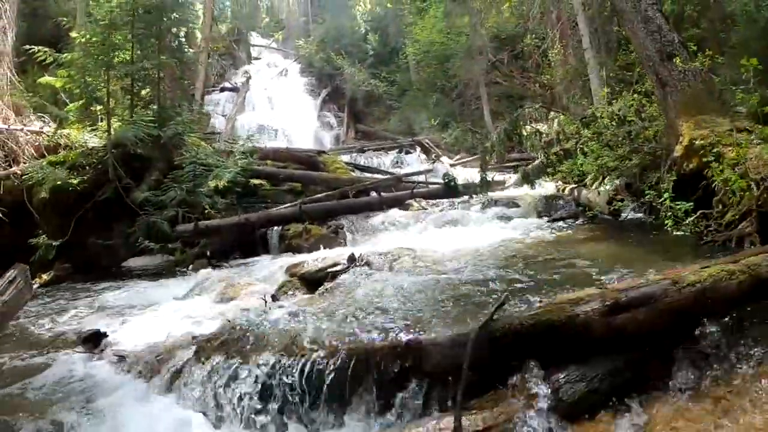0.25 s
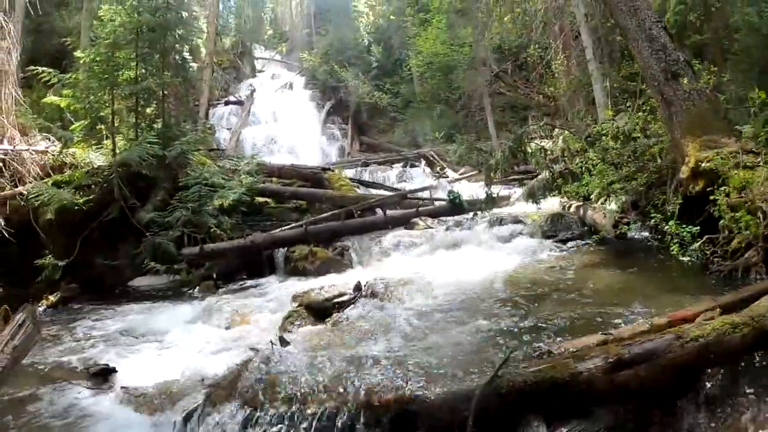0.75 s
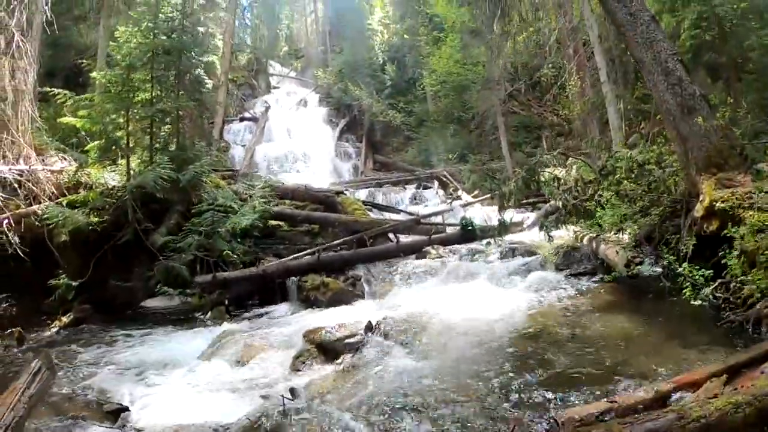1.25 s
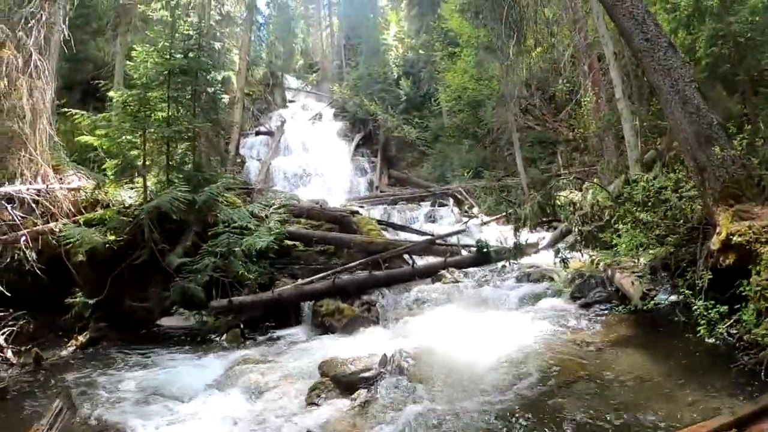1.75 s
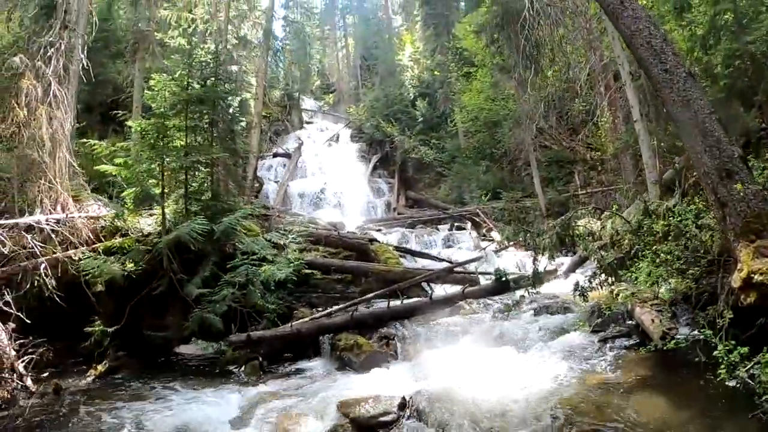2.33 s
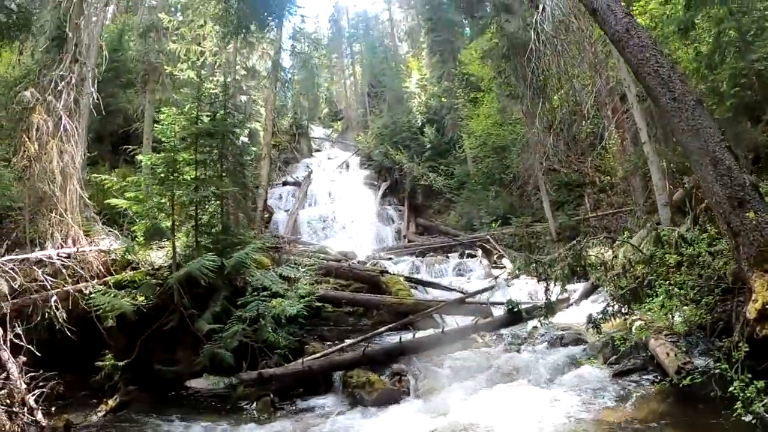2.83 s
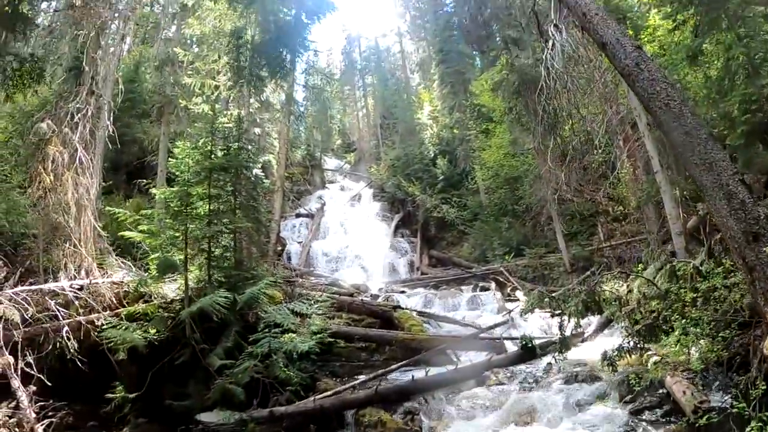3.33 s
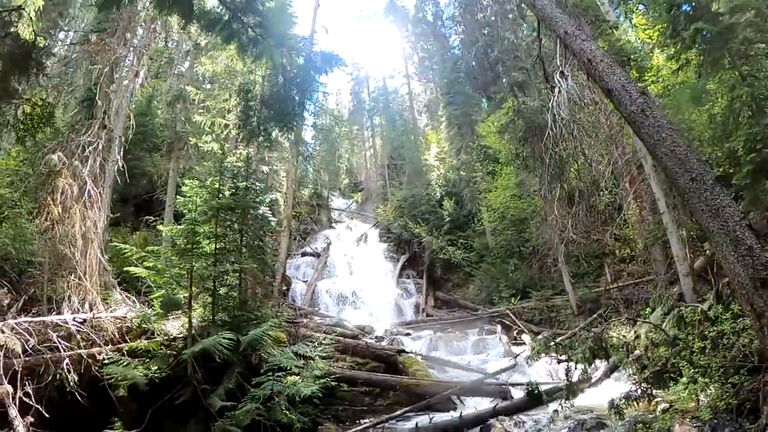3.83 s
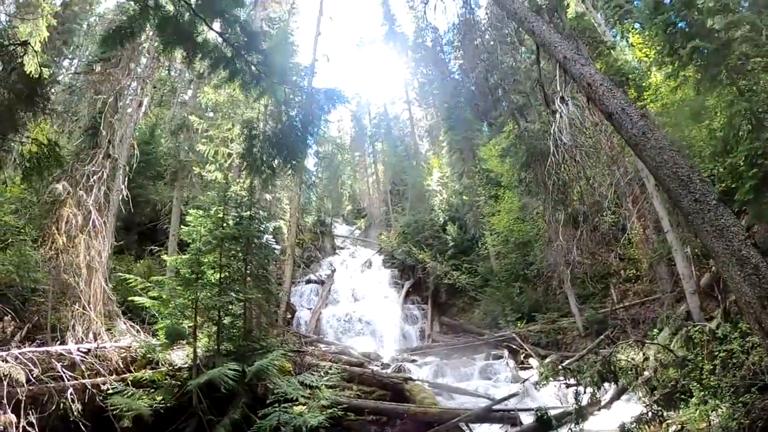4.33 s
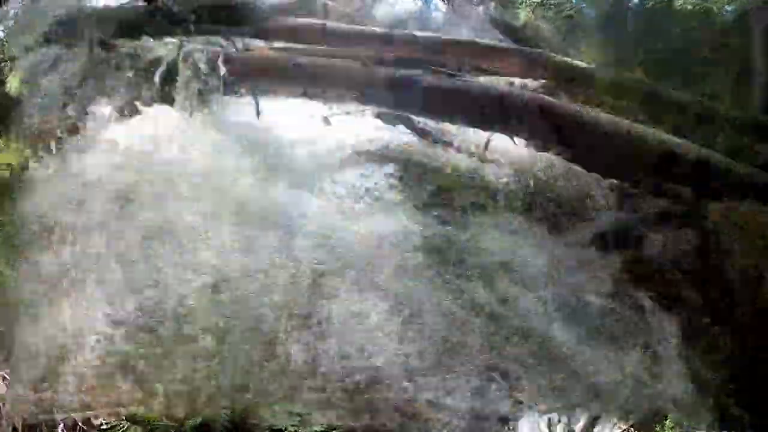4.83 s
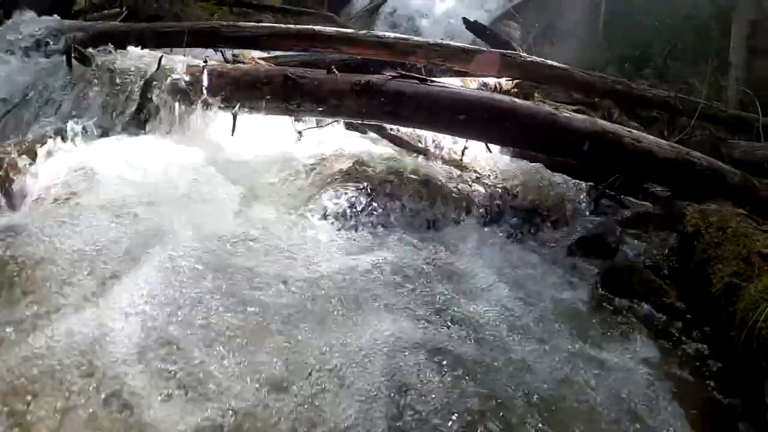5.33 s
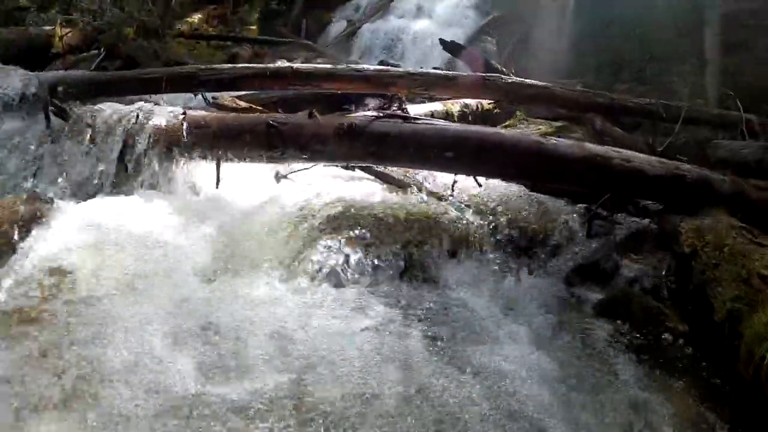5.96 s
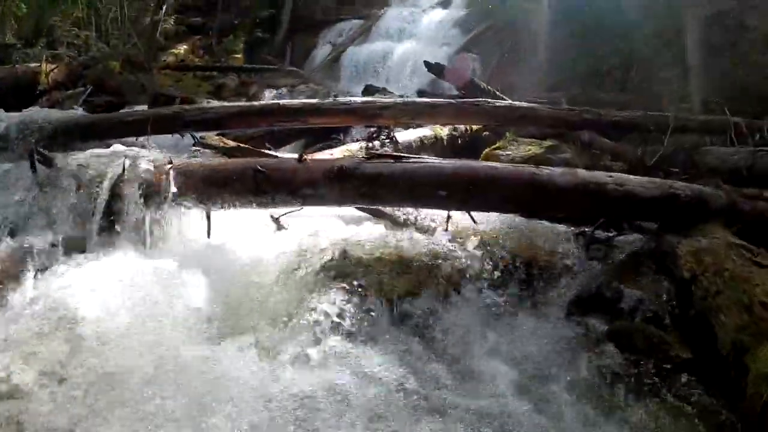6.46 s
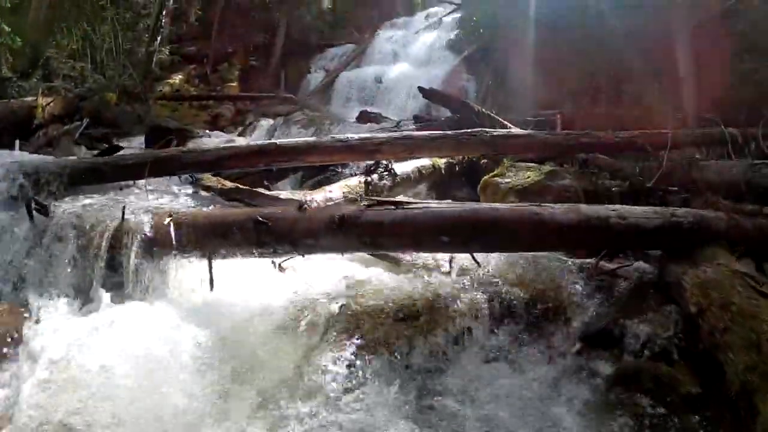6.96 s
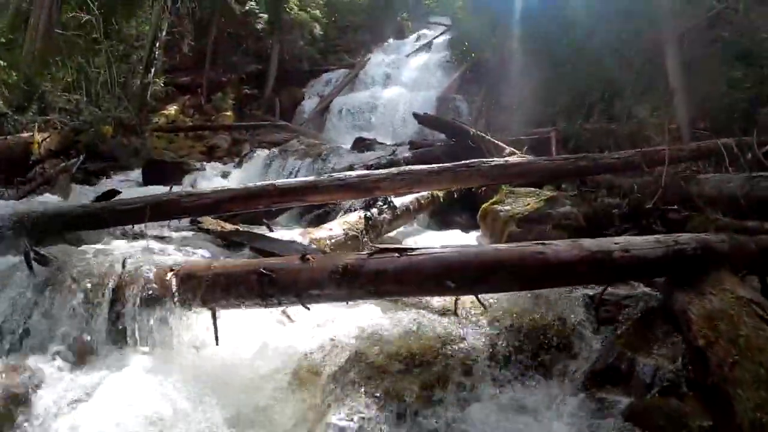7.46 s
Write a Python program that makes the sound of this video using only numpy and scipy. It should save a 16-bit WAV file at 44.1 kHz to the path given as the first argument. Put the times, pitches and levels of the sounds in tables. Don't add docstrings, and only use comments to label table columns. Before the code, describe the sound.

A muffled, hollow roar of waterfall and creek heard through a water-blocked microphone, then an abrupt change to bright, full, splashing rush close by.

```python
import sys
import numpy as np
from scipy import signal
from scipy.io import wavfile
from scipy.ndimage import uniform_filter1d

SR = 44100
rng = np.random.default_rng(int(sys.argv[2]) if len(sys.argv) > 2 else 0)


def volts_from_decibels(level):
    exponent = np.asarray(level, float) / 20
    return 10 ** exponent


def transcribe(signal):
    frames = np.atleast_2d(signal).T
    limited = np.clip(frames, -1, 1)
    pcm = np.round(limited * 32767).astype(np.int16)
    wavfile.write(sys.argv[1], SR, pcm)


N = 339129
CUT_S = 4.8697


def rush(foam, points, rings, layers, low_hz, high_hz, bubbly, patchy_db, flicker_db, steady, splashes):
    water = np.sqrt(1 - bubbly) * rng.standard_normal(len(foam)) + np.sqrt(bubbly) * foam
    hz, t, z = signal.stft(water, SR, nperseg=1024, noverlap=896)
    s = t - .5

    z = z / np.sqrt(uniform_filter1d((abs(z) ** 2).mean(1), size=25))[:, None]
    z = steadied(z, hz, steady)
    z = z / np.sqrt(uniform_filter1d((abs(z) ** 2).mean(1), size=3))[:, None]

    shape = volts_from_decibels(colour_db(points, rings, hz, s))
    body_db, low_db, high_db = layer_db(*layers, s)
    low = 1 / (1 + (hz / low_hz) ** 4)
    high = 1 / (1 + (high_hz / (hz + 1)) ** 4)
    bands = [(low, low_db, hz < low_hz),
             (1 - low - high, body_db, (hz >= low_hz) & (hz < high_hz)),
             (high, high_db, hz >= high_hz)]
    field_db = 0
    for part, db, inside in bands:
        present_db = 10 * np.log10((shape[inside] ** 2).sum(0) * 4 / 3)
        field_db = field_db + part[:, None] * (db - present_db)

    for (at_s, centre_hz, db, length_s), breadth in splashes:
        spread = np.exp(-(np.log((hz + 1) / centre_hz) / breadth) ** 2)
        field_db = field_db + np.outer(db * spread, bell(s - at_s, length_s))

    patches = blotches(z.shape, bins=14, frames=24)
    flicker = blotches(z.shape, bins=200, frames=6)
    z = z * shape * volts_from_decibels(field_db + patchy_db * patches + flicker_db * flicker)
    return signal.istft(z, SR, nperseg=1024, noverlap=896)[1][SR // 2:][:N]


def bubbles(per_s, spread_db, cycles):
    out = np.zeros(N + SR)
    for hz in np.geomspace(80, 16000, num=30):
        t = np.arange(0, cycles / hz, 1 / SR)
        rising = 1 + 0.061 * hz * t / cycles
        tone = np.sin(2 * np.pi * hz * t * rising) * np.hanning(len(t))
        chance, size = rng.random(len(out)), rng.exponential(1, len(out))
        often = per_s * hz / 1000
        train = (chance < often / SR) * volts_from_decibels(spread_db * np.minimum(size, 4))
        out += evened(signal.oaconvolve(train, tone)[:len(out)]) * np.sqrt(hz)
    return evened(out)


# (level [dB], drift while turning [dB/s], share of the fade [1])
BLOCKED = [
    (-16, -1.07, 0.61),
    (-29, -0.86, 0.96),
    (-43.5, -0.7, 0.66),
]
# (frequency [Hz], density [dB/Hz])
FILM = [(8, -19), (25, -12.5), (100, -12.5), (300, -15.5), (600, -18.5), (1000, -33), (1500, -39),
        (2600, -51), (3000, -58.5), (3700, -61.5), (5400, -68.5), (9000, -76), (10500, -87), (16000, -101)]
# (frequency [Hz], width [Hz], boost [dB], pitch drift [Hz/s], boost drift [dB/s])
FILM_RINGS = [
    (458, 64, 16.5, 7, -0.5),
    (1054, 52, -5.5, 2, 0.5),
    (1196, 70, 10, -0.5, -0.5),
    (4440, 240, 2, -0.5, 1.34),
    (6200, 600, 4, -1, 0),
    (8800, 2500, 3.5, -3, -0.45),
    (11800, 1200, 7, -1, -0.8),
]
# (start [s], end [s])
TILT_UP = (0., 3)
# (length [s], gain left [1])
FADE_OUT = (0.19, 0.21)
# (time [s], frequency [Hz], boost [dB], length [s])
SWELLS = [(0.319, 90, 9.5, 0.06), (0.36, 150, -6, 0.069), (0.528, 100, -2, 0.06), (0.673, 60.4, 6, 0.06),
          (0.842, 270, 4.5, 0.11), (0.888, 119, 8, 0.06), (0.952, 60, 3, 0.06), (1.051, 100, 9, 0.074),
          (1.265, 50, -5.4, 0.06), (1.353, 80.3, 6.5, 0.06), (1.834, 80, 6.5, 0.057), (2.09, 190, 0, 0.06),
          (2.154, 100, -8, 0.12), (2.397, 140.6, 2.5, 0.16), (2.769, 129, -7, 0.06), (2.792, 70, -9, 0.06),
          (2.879, 100, 7, 0.06), (3.001, 80, 0, 0.06), (3.042, 50, 7, 0.06), (3.39, 109, -4.3, 0.1),
          (3.495, 150, 4.5, 0.06), (3.756, 50, 5.5, 0.11), (4.122, 60.5, 8, 0.06), (4.313, 210, 4, 0.06),
          (4.592, 60, 5, 0.06), (4.696, 70, -2, 0.06)]


def blocked_falls(foam):
    return rush(foam, FILM, FILM_RINGS, (BLOCKED, TILT_UP, FADE_OUT), low_hz=250, high_hz=900,
                bubbly=.3, patchy_db=.5, flicker_db=.5, steady=.5, splashes=[(row, .33) for row in SWELLS])


# (level [dB], drift while turning [dB/s], share of the fade [1])
CLEAR = [
    (-16.5, -0.15, 0.98),
    (-19.5, -0.58, 0.54),
    (-23, 0.45, 0.52),
]
# (frequency [Hz], density [dB/Hz])
FOAM = [(8, -19), (20, -5), (80, -5.5), (140, -2), (300, -2), (500, -6), (1200, -9), (3000, -15),
        (6000, -21), (8500, -28), (10000, -34.5), (12000, -44.5), (14000, -52), (15700, -59.5)]
# (frequency [Hz], width [Hz], boost [dB], pitch drift [Hz/s], boost drift
# [dB/s])
FOAM_RINGS = [
    (445, 15, 3, -32, 0.24),
    (250, 60, 0, -9.5, -0.2),
    (148, 24, -0.5, 0.5, 0.98),
    (8030, 980, 13.5, -0.5, -0.1),
]
# (start [s], end [s])
RISE_UP = (4.3, 8.2)
# (length [s], gain at its start [1])
FADE_IN = (0.074, 0.5)
# (time [s], frequency [Hz], boost [dB], length [s])
SPLASHES = [(5.04, 1760, 2.3, 0.065), (5.083, 4420, 4.5, 0.025), (5.111, 2250, -0.5, 0.02),
            (5.263, 840, 6, 0.02), (5.323, 550, 5, 0.018), (5.431, 550, 1, 0.02), (5.478, 550, -4, 0.023),
            (5.495, 950, 2.8, 0.023), (5.545, 3460, 2, 0.02), (5.626, 840, -7.5, 0.02),
            (5.699, 4710, 6, 0.02), (5.718, 1473, 4.5, 0.06), (5.847, 664, 5.5, 0.02),
            (6.075, 950, 2.5, 0.032), (6.204, 910, -5.0, 0.029), (6.336, 660, 3.5, 0.01),
            (6.342, 2390, 2.5, 0.053), (6.408, 2880, 4.5, 0.02), (6.417, 550, -2, 0.02),
            (6.43, 2250, -3, 0.02), (6.591, 1220, 5.5, 0.02), (6.643, 1380, 2, 0.02),
            (6.666, 750, -4, 0.06), (6.667, 4990, 4.5, 0.02), (6.73, 660, 3, 0.02), (6.87, 3460, 5, 0.02),
            (6.901, 550, 2, 0.018), (6.911, 1220, 4, 0.035), (6.947, 580, -4, 0.02),
            (6.978, 3060, 4.5, 0.02), (7.016, 790, 2.8, 0.043), (7.183, 2540, 6.5, 0.02),
            (7.213, 5640, 3.5, 0.035), (7.275, 550, -1, 0.014), (7.472, 580, 2.5, 0.074),
            (7.499, 1467, 4.5, 0.02), (7.572, 580, 4.5, 0.024)]
# (time [s], frequency [Hz], boost [dB], length [s])
THUMPS = [(4.923, 140, 9, 0.034), (4.963, 140, 5, 0.03), (4.992, 70, 4, 0.03), (5.079, 220, 2, 0.03),
          (5.149, 60, 6.5, 0.03), (5.181, 80, 12.5, 0.03), (5.23, 110, -6.0, 0.03), (5.323, 140, 8, 0.03),
          (5.326, 420, 2.5, 0.03), (5.364, 80, 12, 0.05), (5.433, 289, 3, 0.11), (5.471, 140, 4, 0.03),
          (5.506, 120, -3.5, 0.12), (5.547, 450, 4, 0.024), (5.564, 60, 5.0, 0.03), (5.605, 90, -5.5, 0.12),
          (5.611, 321, 3, 0.03), (5.689, 100, 6, 0.03), (5.77, 140, 1.5, 0.071), (5.808, 70, 9, 0.03),
          (5.883, 90, -10.5, 0.03), (5.921, 140, 4.5, 0.027), (5.97, 60, -6.0, 0.03), (5.982, 120, 7, 0.03),
          (6.058, 191, -15, 0.03), (6.087, 140, 0.5, 0.03), (6.121, 80, 9, 0.03), (6.313, 80, 7, 0.03),
          (6.362, 141, -7, 0.12), (6.394, 80, 14, 0.03), (6.438, 220, -10, 0.03), (6.58, 100, 5, 0.05),
          (6.603, 80, -8.5, 0.08), (6.629, 208, -1, 0.12), (6.664, 60, -7, 0.03), (6.699, 101, 6.5, 0.05),
          (6.708, 60, 4.4, 0.03), (6.751, 60, -5, 0.03), (6.835, 180, -7, 0.03), (6.841, 120, -6.5, 0.03),
          (6.998, 60, -6.0, 0.03), (7.053, 60, 6.5, 0.03), (7.134, 100, 8, 0.036), (7.277, 60, -6.5, 0.03),
          (7.308, 260, -0.5, 0.03), (7.349, 140.4, 5.5, 0.03), (7.384, 340, 3.8, 0.036),
          (7.532, 139.6, -1.5, 0.13), (7.607, 80, -6, 0.03), (7.657, 340, 2, 0.03)]


def open_falls(foam):
    splashes = [(row, .42) for row in SPLASHES] + [(row, .28) for row in THUMPS]
    return rush(foam, FOAM, FOAM_RINGS, (CLEAR, RISE_UP, FADE_IN), low_hz=400, high_hz=4000,
                bubbly=.4, patchy_db=0.76, flicker_db=.5, steady=0.33, splashes=splashes)


# (time [s], peak [dB], frequency [Hz], length [s])
FIRST_GULP = (0, -12.5, 465, .008)
# (time [s], peak [dB], frequency [Hz], length [s])
GULPS = [(0.044, -12, 468, 0.0072), (0.148, -10.5, 448, 0.014), (0.179, -12, 462, 0.014),
         (0.249, -8, 472, 0.011), (0.292, -11.5, 484, 0.015), (0.358, -10, 460, 0.0076),
         (0.626, -14, 478, 0.01), (0.65, -14.5, 476, 0.01), (0.68, -6, 458, 0.0098),
         (0.731, -10, 488, 0.0065), (0.775, -10, 475, 0.012), (0.918, -7.5, 466, 0.0088),
         (0.954, -14.5, 452, 0.014), (0.974, -9.5, 456, 0.0053), (1.059, -10.5, 445, 0.0095),
         (1.113, -10.5, 452, 0.0043), (1.292, -15, 460, 0.0059), (1.449, -11, 480, 0.0063),
         (1.555, -9.5, 462, 0.0088), (1.592, -14, 462, 0.0117), (1.646, -10.5, 462, 0.014),
         (1.823, -11.5, 466, 0.017), (1.881, -8, 480, 0.008), (1.956, -7, 465, 0.01),
         (2.189, -11.5, 496, 0.0069), (2.247, -17, 436, 0.01), (2.334, -12, 460, 0.0054),
         (2.563, -7.5, 457, 0.015), (2.614, -10, 480, 0.009), (2.861, -8, 446, 0.0053),
         (2.9, -11, 482, 0.0058), (2.926, -12.8, 490, 0.005), (3.082, -9.5, 453, 0.0053),
         (3.372, -14, 487, 0.009), (3.397, -12.5, 445, 0.013), (3.441, -14, 453, 0.017),
         (3.661, -12, 466, 0.018), (3.781, -15.5, 475, 0.013), (3.836, -14, 474, 0.012),
         (3.944, -14.5, 478, 0.016), (4.006, -10.5, 490, 0.0083), (4.133, -12, 471, 0.014),
         (4.309, -5, 485, 0.0073), (4.359, -12.1, 490, 0.012), (4.585, -13.5, 454, 0.015),
         (4.626, -11.5, 508, 0.008), (4.679, -16, 490, 0.018), (4.696, -12, 493, 0.013)]
# (time [s], peak [dB], frequency [Hz], length [s])
SMALL_GULPS = [(0.217, -11.5, 466, 0.0052), (0.438, -11.5, 463, 0.0068), (0.48, -9.5, 478, 0.0084),
               (0.55, -14.5, 458, 0.014), (0.586, -12.5, 450, 0.0048), (0.751, -12, 460, 0.0048),
               (0.828, -16.5, 444, 0.007), (1.035, -12.5, 466, 0.017), (1.156, -10.5, 480, 0.0066),
               (1.185, -13.2, 498, 0.007), (1.217, -16, 458, 0.006), (1.335, -16, 468, 0.0043),
               (1.682, -13, 449, 0.019), (1.722, -13.5, 469, 0.006), (1.761, -11.5, 464, 0.017),
               (1.906, -10, 466, 0.007), (1.983, -12.5, 480, 0.012), (2.044, -13.5, 500, 0.0086),
               (2.121, -12, 475, 0.0048), (2.281, -11, 451, 0.0046), (2.3, -13, 463, 0.0055),
               (2.397, -15, 495, 0.006), (2.431, -11, 460, 0.011), (2.505, -12, 467, 0.0063),
               (2.524, -14, 461, 0.0078), (2.647, -12.5, 467, 0.0043), (2.71, -11.5, 460, 0.009),
               (2.783, -14.1, 483, 0.0062), (2.815, -12.9, 480, 0.015), (2.879, -18, 496, 0.0067),
               (2.999, -15, 477, 0.012), (3.045, -15.5, 466, 0.0038), (3.11, -13.5, 487, 0.009),
               (3.145, -13.5, 504, 0.0055), (3.189, -14.4, 438, 0.015), (3.293, -15, 483, 0.008),
               (3.599, -13.5, 457, 0.0079), (3.635, -15.5, 464, 0.0067), (3.691, -18, 479, 0.012),
               (3.862, -11, 472, 0.012), (3.969, -15, 457, 0.011), (4.043, -16, 478, 0.013),
               (4.209, -14.6, 476, 0.02), (4.225, -14, 470, 0.0055), (4.243, -14.5, 466, 0.016),
               (4.396, -14.0, 471, 0.01), (4.568, -16.5, 459, 0.009), (4.665, -19, 492, 0.006)]


def trapped_air(roar, ceiling_db):
    ring = band_of(roar, 380, 580)
    power = uniform_filter1d(ring ** 2, size=300) + 1e-12
    excess = power / uniform_filter1d(power, size=SR // 2) / volts_from_decibels(2 * ceiling_db)
    calm = (1 + excess ** 4) ** (-1 / 8)
    surges, left = bursts([FIRST_GULP, *GULPS, *SMALL_GULPS])
    return roar + ring * (calm * left * lull_gain() - 1) + surges


# (time [s], depth [dB], length [s])
LULLS = [(0.021, 5.1, 0.011), (0.064, 3, 0.03), (0.403, 6.5, 0.034), (0.453, 12, 0.019), (0.51, 5, 0.027),
         (0.572, 7.5, 0.017), (0.613, 12, 0.016), (0.642, 7, 0.01), (0.713, 10, 0.015), (0.847, 2, 0.02),
         (0.884, 5.6, 0.027), (1.098, 5, 0.017), (1.171, 14, 0.013), (1.262, 12, 0.014), (1.424, 4, 0.034),
         (1.495, 7, 0.028), (1.635, 7, 0.012), (1.71, 5.7, 0.012), (1.844, 12, 0.015), (1.997, 9, 0.013),
         (2.08, 14, 0.017), (2.148, 8, 0.012), (2.312, 10, 0.013), (2.637, 12, 0.012), (2.74, 7.2, 0.024),
         (2.846, 4, 0.011), (3.099, 11, 0.012), (3.254, 6, 0.03), (3.342, 7, 0.012), (3.543, 3, 0.015),
         (3.623, 3, 0.019), (3.808, 3, 0.014), (3.902, 5, 0.023), (4.025, 12, 0.011), (4.261, 11, 0.016),
         (4.413, 5.3, 0.014), (4.495, 5, 0.03), (4.545, 7.0, 0.028), (4.753, 6, 0.018), (4.842, 0, 0.012)]


def lull_gain():
    t = np.arange(0, N / SR, 1 / 1000)
    lull_db = sum(db * bell(t - s, length_s) for s, db, length_s in LULLS)
    return volts_from_decibels(-np.interp(np.arange(N) / SR, t, lull_db))


# (time [s], peak [dB], frequency [Hz])
GURGLES = [(4.937, -18.5, 323), (5.016, -14, 288), (5.081, -13.5, 242), (5.172, -15, 227.4),
           (5.209, -15.5, 257), (5.28, -18, 310), (5.336, -15.5, 242), (5.38, -19, 267),
           (5.432, -14.5, 276), (5.497, -15.5, 253), (5.542, -17.7, 346), (5.574, -15.5, 229.4),
           (5.603, -16, 294), (5.75, -17.0, 236.6), (5.833, -15, 272.6), (5.873, -14.5, 232.5),
           (5.994, -19.5, 240), (6.102, -18, 208), (6.158, -14, 279), (6.207, -15, 209), (6.399, -18, 247),
           (6.579, -17, 191), (6.631, -15.5, 214), (6.658, -17, 303.5), (6.741, -17.5, 219),
           (6.905, -17.5, 211), (6.967, -19.5, 190), (7.057, -18, 236), (7.076, -17, 197.4),
           (7.12, -16.5, 254), (7.142, -17.4, 234.4), (7.192, -15.1, 243), (7.314, -13.5, 240),
           (7.381, -18, 362), (7.516, -16.5, 206), (7.655, -17.6, 350)]


def plunge_pool(roar):
    low = band_of(roar, 170, 380)
    length_s = 0.017
    tolls, left = bursts([(*row, length_s) for row in GURGLES])
    return roar + 0.57 * low * (left - 1) + tolls


# (time [s], peak [dB], frequency [Hz])
SPLATS = [(4.9058, -20, 7910), (5.0494, -9, 6000), (5.0779, -14, 5150), (5.1483, -9.5, 8340),
          (5.2136, -12, 7200), (5.474, -9, 7890), (5.5523, -17.5, 8040), (5.5957, -16, 8190),
          (5.694, -15, 7880), (5.7135, -15, 8240), (5.7624, -10.5, 7880), (6.0552, -16, 8110),
          (6.7278, -14.5, 7570), (6.848, -36, 12000), (6.9966, -9.5, 7900), (7.2375, -14, 8100),
          (7.2979, -19.5, 8100), (7.3393, -13.5, 7970), (7.4929, -12.5, 7700), (7.5358, -14.5, 8370),
          (7.67, -16.5, 7410)]


def spray_on_port():
    return volts_from_decibels(-1.5) * spatter(SPLATS, width=0.17, t60=0.0089)


# (time [s], peak [dB], frequency [Hz], length [s])
TICKS = [
    (1.1569, -41, 4100, .00017),
    (1.384, -37, 1750, .0012),
    (1.3872, -44, 1900, .0012),
]


def film_drips():
    return bursts(TICKS)[0]


CRACKLES = [.361, .474, .66, .9645, 1.113, 1.45, 1.6446, 2.422, 2.56, 2.566, 2.648, 2.8655, 2.901, 3.081,
            4.297]


def faint_crackles(db):
    return spatter([(s, db, 12500) for s in CRACKLES], width=.3, t60=.04)


def spatter(rows, width, t60):
    out, t = np.zeros(N), np.arange(600) / SR
    for s, db, hz in rows:
        band = [hz / (1 + width), min(hz * (1 + width), 15000)]
        puff = rng.standard_normal(len(t)) * volts_from_decibels(-60 * t / t60) * (1 - np.exp(-t / 0.00045))
        puff = signal.sosfilt(signal.butter(4, band, "bandpass", fs=SR, output="sos"), puff)
        out[round(s * SR):][:len(t)] += volts_from_decibels(db) * puff / abs(puff).max()
    return out


def bursts(rows):
    t, tones, left = np.arange(N) / SR, np.zeros(N), np.ones(N)
    for s, db, hz, length_s in rows:
        near = slice(max(round((s - 3 * length_s) * SR), 0), round((s + 3 * length_s) * SR))
        power = bell(t[near] - s, length_s)
        left[near] *= np.sqrt(1 - power)
        tones[near] -= volts_from_decibels(db) * np.sqrt(power) * np.cos(2 * np.pi * hz * (t[near] - s))
    return tones, left


def layer_db(layers, turn, fade, s):
    turned_s = np.clip(s, *turn) - turn[0]
    length_s, left = fade
    ramp_db = 20 * np.log10(left + (1 - left) * np.clip(abs(s - CUT_S) / length_s, 0, 1))
    return [db + drift * turned_s + share * ramp_db for db, drift, share in layers]


def colour_db(points, rings, hz, s):
    f, db = np.transpose(points)
    total = np.interp(np.log(hz + 1), np.log(f + 1), db)[:, None] + 0 * s
    for f0, width, boost, rise, grow in rings:
        off = (hz[:, None] - f0 - rise * s) / width
        total = total + (boost + grow * s) / (1 + off ** 2)
    return total


def steadied(z, hz, amount):
    near = np.exp(-((hz[:, None] - hz) / (.2 * hz[:, None] + 40)) ** 2)
    local = uniform_filter1d(near / near.sum(1)[:, None] @ abs(z) ** 2, size=12, axis=1)
    return z / (local + 1e-9) ** (amount / 2)


def blotches(shape, bins, frames):
    rough = uniform_filter1d(rng.standard_normal(shape), size=bins, axis=0)
    return evened(uniform_filter1d(rough, size=frames, axis=1))


def band_of(x, low_hz, high_hz):
    sos = signal.butter(2, [low_hz, high_hz], "bandpass", fs=SR, output="sos")
    return signal.sosfiltfilt(sos, x)


def bell(offset_s, length_s):
    return np.exp(-4 * np.log(2) * (offset_s / length_s) ** 2)


def evened(x):
    return x / np.sqrt(np.mean(x ** 2) + 1e-20)


def scene():
    foam = bubbles(per_s=250, spread_db=3.0, cycles=5.45)
    dull = trapped_air(blocked_falls(foam), ceiling_db=2.5) + faint_crackles(db=-75) + film_drips()
    bright = plunge_pool(open_falls(foam)) + spray_on_port()
    mono = np.where(np.arange(N) < CUT_S * SR, dull, bright)
    return np.array([mono, mono])


# (time [s], depth [dB], recovery [s])
DIPS = [
    (6.156, 2.5, 0.038),
    (6.413, 2.5, 0.085),
    (6.937, 2, 0.011),
    (7.263, 1.1, 0.047),
    (7.513, 1, 0.084),
]


def limiter(x):
    t = np.arange(N) / SR
    dip_db = sum(db * np.exp(-abs(t - s) / recovery_s) * (t > s) for s, db, recovery_s in DIPS)
    held = x * volts_from_decibels(-uniform_filter1d(dip_db, size=150))
    return 1.5 * np.tanh(held / 1.5)


# (start [s], end [s], level [dB])
APART = [
    (4.896, 5.014, -1.5),
    (5.948, 6.609, 6),
    (7.036, 7.098, 7),
    (7.584, 7.613, -15),
]


def parting():
    t = np.arange(N) / SR
    return sum(volts_from_decibels(db) * (t > start) * (t < end) for start, end, db in APART)


# (frequency [Hz], level [dB])
MISMATCH = [(60, -26), (110, -24), (200, -52), (380, -27), (700, -31), (1290, -31), (2380, -21),
            (4400, -16), (8120, -15.5), (15000, -35)]


def channel_difference(mono, apart):
    hz, s, z = signal.stft(mono, SR, nperseg=1024)
    scramble = np.exp(2j * np.pi * rng.random(z.shape))
    z = z * scramble * volts_from_decibels(colour_db(MISMATCH, [], hz, s) - 4.0)
    return signal.istft(z, SR, nperseg=1024)[1][:N] * uniform_filter1d(apart, size=400)


def flutter(x, apart):
    hz, s, z = signal.stft(x, SR, nperseg=2048)
    step, sag = rng.random((len(s), 2)).T
    parted = np.interp(s, np.arange(N) / SR, apart) > 0
    edge_hz = 15700 - 550 * (uniform_filter1d(step, size=2) < .5) - 1300 * sag * parted
    kept = (hz[:, None] < edge_hz) | (s < CUT_S + .03)
    return signal.istft(z * kept, SR, nperseg=2048)[1][:, :N]


def band_limit(x):
    return signal.sosfilt(signal.butter(12, 15630, fs=SR, output="sos"), x)


def record(dry):
    held = limiter(dry)
    apart = parting()
    differ = channel_difference(held[0], apart)
    offset = -.0017
    mix = flutter(held, apart) + np.array([differ, -differ]) + offset
    return band_limit(mix)


dry = scene()
out = record(dry)
transcribe(out)
```